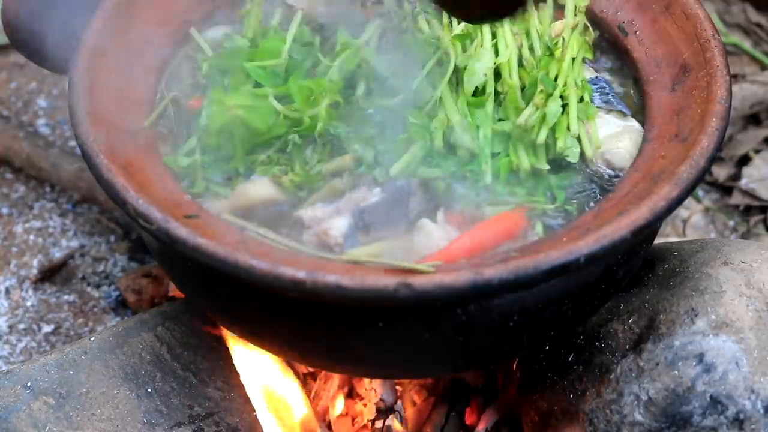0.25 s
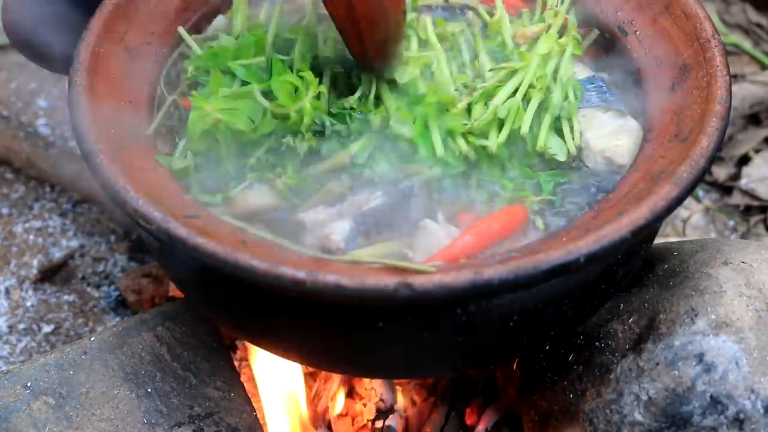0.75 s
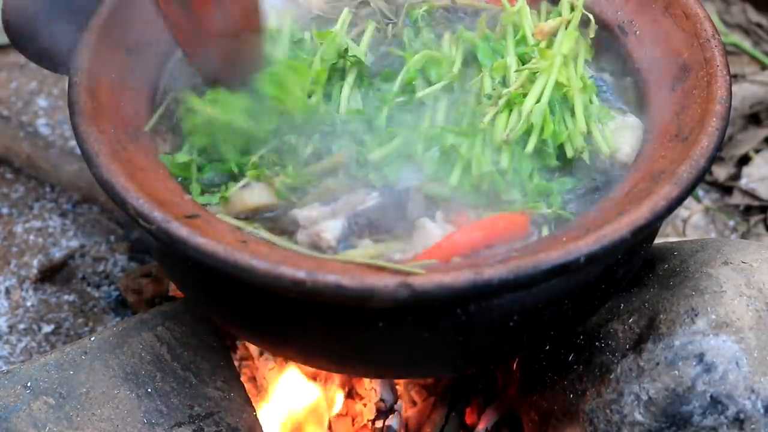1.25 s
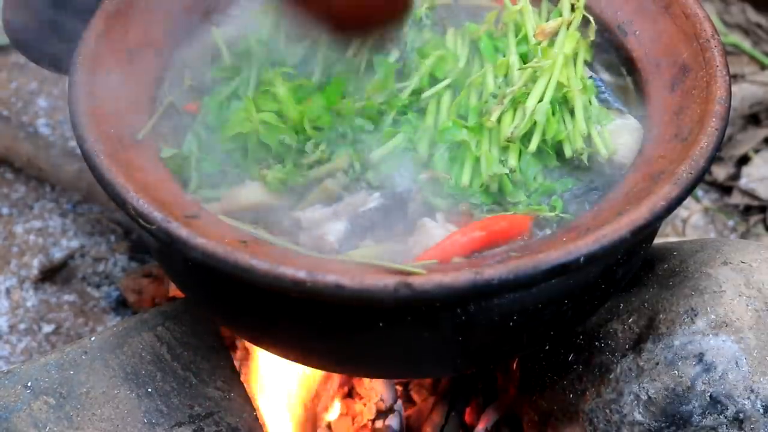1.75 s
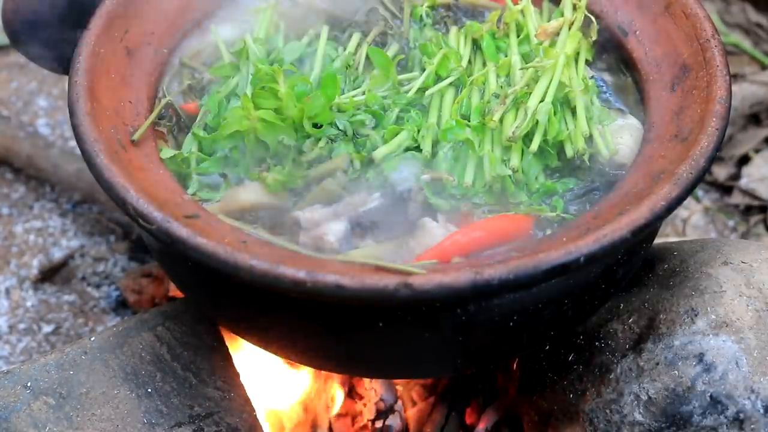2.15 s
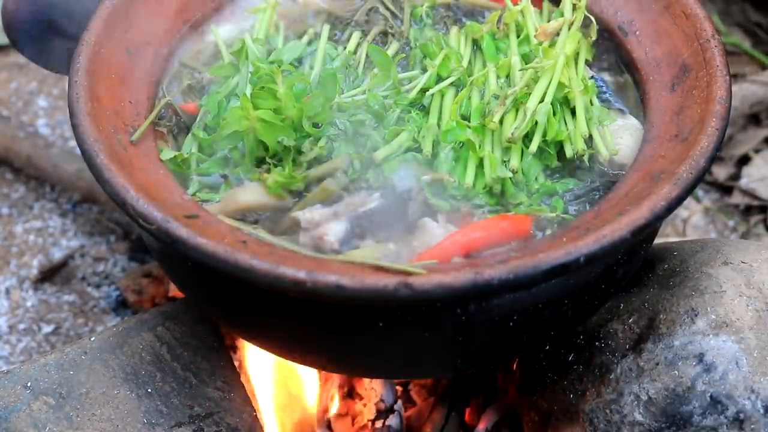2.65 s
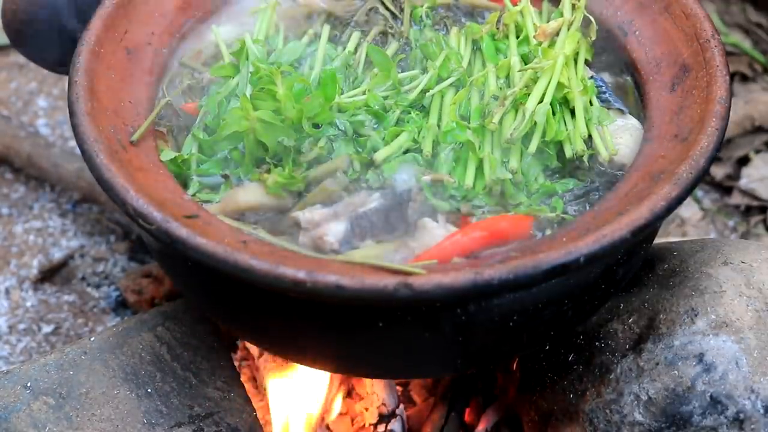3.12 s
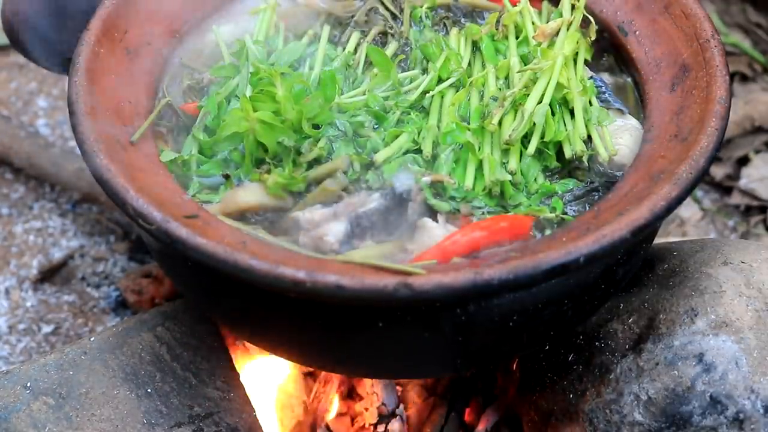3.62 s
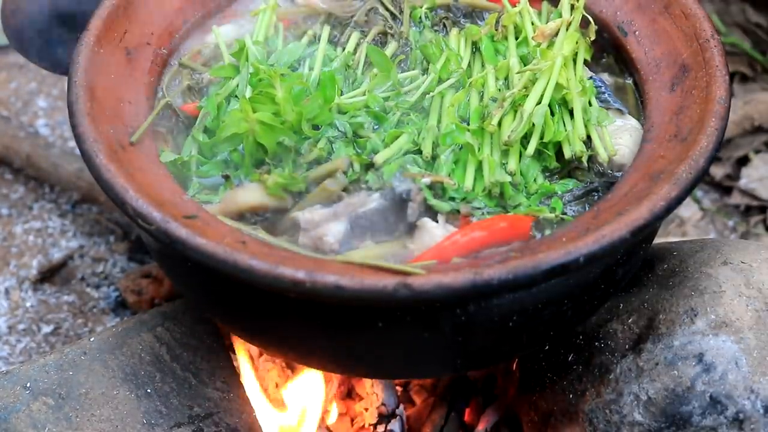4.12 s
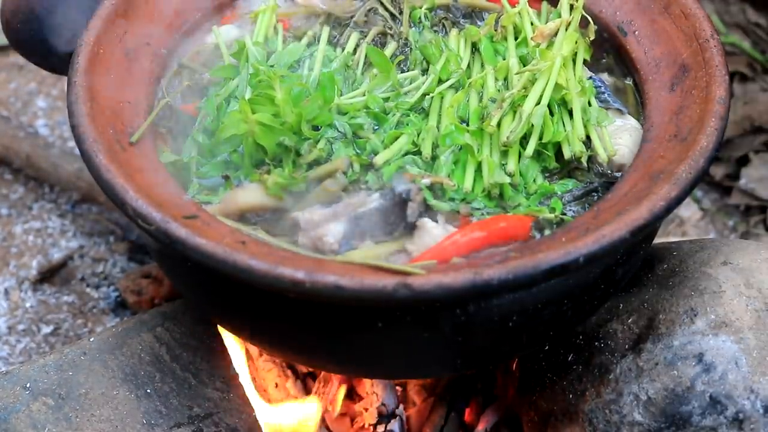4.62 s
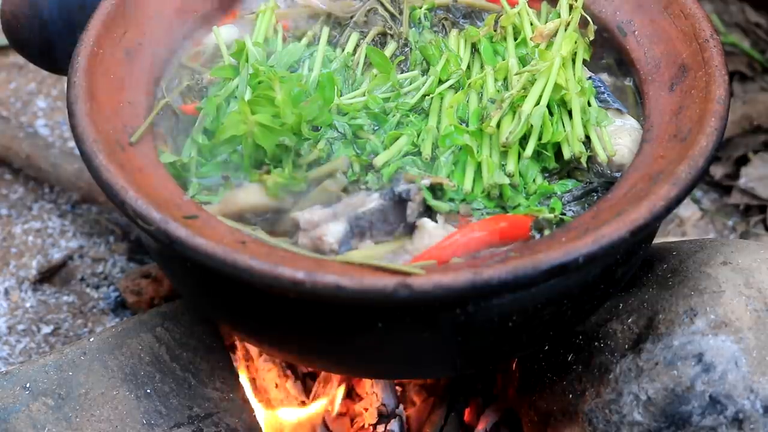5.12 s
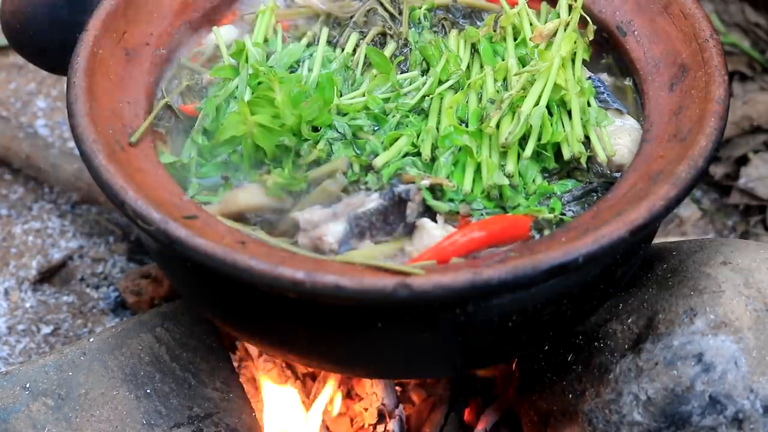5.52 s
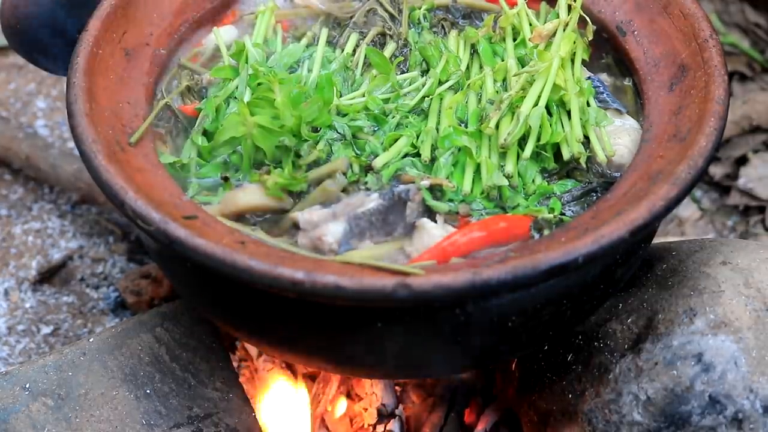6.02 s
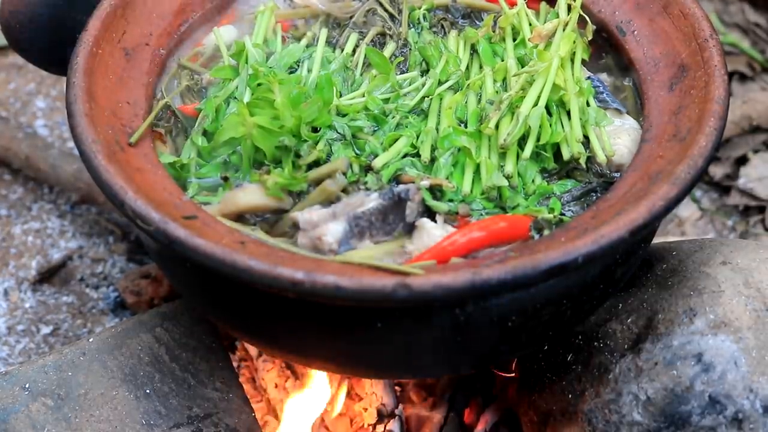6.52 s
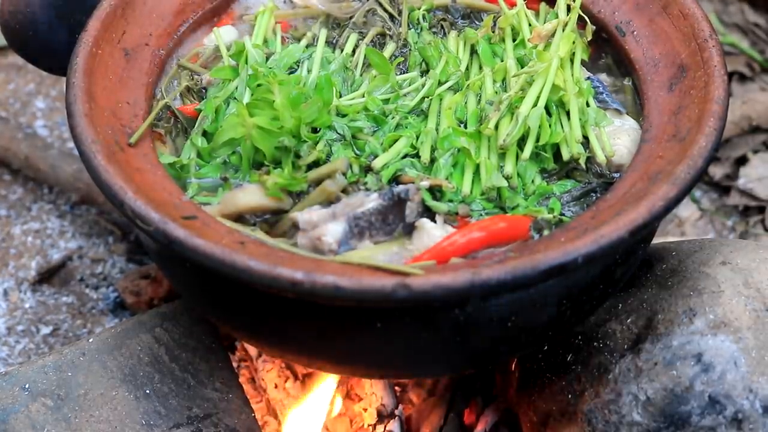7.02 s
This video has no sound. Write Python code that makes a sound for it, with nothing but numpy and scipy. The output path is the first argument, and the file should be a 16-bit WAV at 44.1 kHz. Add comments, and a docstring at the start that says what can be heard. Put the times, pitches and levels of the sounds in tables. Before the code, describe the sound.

A wood fire under a clay pot outdoors, nearly silent at first, then sharp sap pops and dense uneven crackling with one very loud snap.

```python
"""A wood fire burns under a clay pot outdoors: shaped noise makes a soft open-air hiss, and far off an engine drones as
multiples of its turning rate over a rumble. Uneven embers crackle as random narrow-band grains, with a few weak pops;
far birds chirp, and one low soft gurgle sounds, as gliding sines blurred by noise. Just after 2 s bursting sap pops
hard and rings the pot's modes; dense swells of crackle follow from 2.7 s, with more chirps near 4 s. The loudest pop,
a decaying filtered noise burst, comes near 4.4 s and the strongest crackle near 5 s; the fire stays uneven to the end."""
import sys
import numpy as np
from scipy import signal
from scipy.fft import rfft, irfft
from scipy.io import wavfile

SR = 44100
rng = np.random.default_rng(int(sys.argv[2]) if len(sys.argv) > 2 else 0)


def dump(signal):
    """Clip the signal to [-1, 1] and save it as 16-bit WAV at the path in sys.argv[1]."""
    limited = np.clip(np.atleast_2d(signal).T, -1, 1)
    pcm = np.round(limited * 32767).astype(np.int16)
    wavfile.write(sys.argv[1], SR, pcm)


N = 319989


def from_db(db):
    """Level definition: an amplitude ratio is 10 to the power of dB / 20."""
    return 10 ** (np.asarray(db) / 20)


def rms_one(x):
    """Normalization: divides x by its root mean square."""
    return x / np.sqrt(np.mean(x ** 2) + 1e-20)


def in_time(rows):
    """Linear interpolation: the columns of a curve table, one value a sample."""
    s, *columns = np.transpose(rows)
    return [np.interp(np.arange(N) / SR, s, column) for column in columns]


def coloured(x, spectrum):
    """Spectral shaping: weights the Fourier components of x by a (f/Hz, level/dB per Hz) curve; rms 1."""
    hz, level_db = np.transpose(spectrum)
    log_grid = np.log(np.arange(N // 2 + 1) * SR / N + 1)
    gain = from_db(np.interp(log_grid, np.log(hz), level_db))
    return rms_one(irfft(rfft(x) * gain, N))


def drift(rate_hz):
    """Low-passed noise as slow chance: two equal poles at rate_hz, one draw every 20 samples; spread 1."""
    r = np.exp(-2 * np.pi * rate_hz * 20 / SR)
    white = rng.standard_normal(N // 20 + 2002)
    slow = signal.lfilter([1], [1, -2 * r, r * r], white)[2000:]   # past the settling of the filter
    return np.interp(np.arange(N) / 20, np.arange(len(slow)), rms_one(slow))


def resonance(x, hz, width_hz):
    """Damped resonance: a two-pole band-pass with gain 1 on top."""
    r = np.exp(-np.pi * width_hz / SR)
    feedback = [1, -2 * r * np.cos(2 * np.pi * hz / SR), r * r]
    return signal.lfilter([(1 - r * r) / 2, 0, (r * r - 1) / 2], feedback, x)


def narrow(x, hz, width_share):
    """Cascaded resonance: two passes give steep flanks; rms 1."""
    once = resonance(x, hz, width_share * hz)
    return rms_one(resonance(once, hz, width_share * hz))


def ring(clicks, hz, t60):
    """Impulse response of one mode: a unit click sets off a decaying sine of initial height 1."""
    r, w = from_db(-60 / (t60 * SR)), 2 * np.pi * hz / SR
    return signal.lfilter([0, np.sin(w)], [1, -2 * r * np.cos(w), r * r], clicks + 1e-18)


def open_air():
    """Broadband turbulence: white noise shaped into open-air hiss and flame rumble."""
    # relative spectrum of hiss and rumble: f/Hz, level/dB per Hz
    air_spectrum = [(15, -36), (32, 3), (134, 2), (451, -11.5), (677, -5.5), (734, -12), (2410, -15),
                    (3340, -7.5), (4370, -9), (5140, -9), (6210, -10.5), (7710, -5.5), (8590, -16),
                    (14800, -19), (16000, -8.5)]
    level_db = -58.5
    return from_db(level_db) * coloured(rng.standard_normal(N), air_spectrum)


def engine():
    """Harmonic series of a rotating source: its multiples come and go and waver in the air, over a dull rumble."""
    # turning rate and rumble of the far engine: t/s, f/Hz (turns per s), rumble level/dB
    turning = [(0, 43.6, -70), (1.1, 43.6, -101), (1.3, 43.7, -71), (3.1, 43.4, -64.5), (3.35, 36.5, -64),
               (3.9, 36.5, -69), (4.1, 41, -67), (5.05, 42, -68), (5.3, 44, -59.5), (5.9, 46.5, -64.5),
               (7.26, 48, -67)]
    # spells in which one multiple carries: start t/s, length t/s, mid level/dB, multiple of the turning rate
    spells = [(-.3, 1.4, -70, 3), (1.146, 1.1, -66, 2), (1.144, 0.71, -77, 3), (1.19, 1, -68, 4),
              (2.3, 0.57, -68, 2), (3.25, 2.17, -65, 4), (3.9, 1.1, -78.5, 2), (5.15, 1.3, -66.5, 3),
              (5.9, 1.27, -65, 2), (6.7, .9, -71, 4)]
    spell_edge_s = 0.096
    hz, rumble_db = in_time(turning)
    t = np.arange(N) / SR
    phase = 2 * np.pi * np.cumsum(hz * (1 + 0.0052 * drift(3.1))) / SR
    tones = 0
    for s, length, level_db, multiple in spells:
        gate = np.clip(np.minimum(t - s, s + length - t) / spell_edge_s, 0, 1)
        wavering = from_db(level_db + 2.6 * drift(5.3))
        tones = tones + gate * wavering * np.sin(round(multiple) * phase)
    rumble = narrow(rng.standard_normal(N), 106, 1.15)
    return tones + from_db(rumble_db) * rumble


def birds_and_gurgle():
    """Amplitude modulation by noise: gliding sines, birds blurred by distance and leaves, and one low soft gurgle."""
    # far chirps of birds; first row a low, soft gurgle near 1.1 kHz:
    # start t/s, length t/s, first f/Hz, last f/Hz, level/dB before the blur
    glides = [(.65, .12, 1100, 1200, -57), (0.548, 0.15, 5260, 5460, -58), (1.1, 0.14, 4950, 4760, -56),
              (1.441, 0.14, 2900, 3100, -60), (1.606, 0.14, 4950, 5130, -59), (1.755, 0.2, 3390, 3450, -61),
              (3.582, 0.12, 3550, 3440, -52), (3.67, 0.15, 5050, 4600, -50), (4.2, 0.23, 3740, 3600, -52)]
    blur_rate_hz = 280
    out = np.zeros(N)
    blur = drift(blur_rate_hz)
    for s, length, first_hz, last_hz, level_db in glides:
        at, count = round(s * SR), round(length * SR)
        phase = 2 * np.pi * np.cumsum(np.linspace(first_hz, last_hz, count)) / SR
        tone = np.sqrt(np.hanning(count)) * np.sin(phase)
        out[at:at + count] += from_db(level_db) * tone * blur[at:at + count]
    return out


def pot():
    """Modal excitation: a few blows reach the clay and leave its modes ringing."""
    # blows on the pot, to which each mode adds its own level: t/s, level/dB
    pot_blows = [(2.205, -52), (2.314, -52), (2.328, -64), (3.774, -58)]
    # modes of the clay: f/Hz, level/dB against the blow, decay by 60 dB t/s
    pot_modes = [(540, 14.5, 0.081), (1090, 4, 0.34), (1097, 21, 0.046), (1900, 18.5, 0.047)]
    s, blow_db = np.transpose(pot_blows)
    blows = np.zeros(N)
    blows[np.round(s * SR).astype(int)] = from_db(blow_db)
    return sum(from_db(level_db) * ring(blows, hz, t60) for hz, level_db, t60 in pot_modes)


def embers_flares_and_tails():
    """Power addition of incoherent sources: embers, flares and pop tails sum to level, coarse and fine share in dB."""
    # uneven simmer of the embers, rising and sinking under the flares: t/s, level/dB
    ember_curve = [(0, -62.5), (.12, -58.5), (.98, -62.5), (1.9, -59.5), (2.17, -65.5), (2.69, -64.5),
                   (2.73, -48.5), (3.25, -50.5), (3.84, -61.5), (4.3, -53), (4.8, -50), (5.3, -46),
                   (5.77, -61.5), (6.13, -50), (6.5, -53.5), (6.78, -60.5), (7.26, -76)]
    # flares of crackle; the two rows just after 2.2 s are dying tails of hard pops:
    # top reached t/s, held t/s, level/dB, rise and fade t/s over 20 dB (at least 0.005 s),
    # coarse wood level/dB, fine ash level/dB, both against the row's level
    swell_rows = [(.36, .1, -59, 0.11, 1.4, 5.5, 8), (1.42, 0.052, -57, 0.54, 0.18, 0, 13),
                  (2.208, .005, -53, .005, 0.1, -8, 11), (2.335, 0.0045, -48.5, .005, 0.061, -6, -5),
                  (2.711, 0.023, -43, 0.0055, 0.034, -2, 11), (2.776, .06, -45, 0.025, .05, 5, 5.5),
                  (2.862, 0.043, -41.5, 0.053, 0.025, 8, 7.5), (2.935, 0.025, -41, 0.012, 0.036, 3, -2),
                  (2.995, .06, -42.5, .05, 0.042, -12, -1), (3.09, 0.1, -39, 0.2, 0.056, -2.5, -2),
                  (3.265, 0.0081, -40, .05, 0.03, -1.5, -1), (3.385, 0.089, -38.5, 0.068, 0.2, -2.5, -1),
                  (3.62, 0.1, -45.5, 0.044, 0.059, -0.5, 0.5), (3.885, 0.015, -51.5, 0.021, 0.22, 3.5, 4),
                  (4.4, 0.017, -38.5, 0.043, 0.053, -0.5, -2),
                  (4.449, 0.0055, -37, 0.025, 0.075, -5.5, -0.5),
                  (4.65, 0.024, -45.5, 0.24, 0.025, -13, -2), (4.711, 0.11, -41, 0.015, 0.16, -7, -3),
                  (4.872, 0.061, -33, 0.027, 0.017, -7.5, -3), (5.05, 0.016, -37.5, 0.12, 0.075, -0.5, 5),
                  (5.098, 0.01, -32.5, 0.034, 0.15, 2.5, 0.5), (5.22, 0.082, -41, 0.19, 0.022, -1, 3.5),
                  (5.39, 0.051, -44.5, 0.038, 0.079, -2, -0.5), (5.495, 0.042, -40, 0.031, 0.013, -2.5, 4),
                  (5.61, 0.028, -46, .06, 0.062, 2.5, -4), (5.83, 0.0085, -58, 0.036, 0.027, 13, 11),
                  (5.92, 0.11, -49, 0.027, 0.023, 2, -5), (6.3, 0.011, -50, 0.17, 0.3, -19, 9.5),
                  (6.56, 0.02, -43, 0.093, 0.16, -4.5, 5.5), (6.68, 0.0053, -50.5, .03, 0.021, -4, 11),
                  (6.724, 0.0091, -47.5, 0.016, 0.019, -1.5, 5), (6.8, .01, -52, 0.055, 0.3, 3.5, 0),
                  (6.937, 0.035, -41.5, 0.11, 0.089, -9.5, 3.5), (7.04, 0.079, -47, 0.065, 0.053, -5, 7),
                  (7.23, 0.041, -48, .12, .1, -7, 4)]
    ember_coarse_db, ember_fine_db = 2.5, 2.5   # against the ember level
    t = np.arange(0, N, 32) / SR
    level = from_db(np.interp(t, *np.transpose(ember_curve))) ** 2   # powers from here on
    coarse, fine = level * from_db(2 * ember_coarse_db), level * from_db(2 * ember_fine_db)
    for s, held, top_db, rise, fade, coarse_db, fine_db in swell_rows:
        before = np.maximum((s - t) / max(rise, .005), 0)
        after = np.maximum((t - s - held) / max(fade, .005), 0)
        power = from_db(top_db - 20 * (before + after)) ** 2
        level = level + power
        coarse = coarse + power * from_db(2 * coarse_db)
        fine = fine + power * from_db(2 * fine_db)
    curves_db = 10 * np.log10([level, coarse / level, fine / level])
    return in_time(np.transpose([t, *curves_db]))


def crackle():
    """Random impulse process: tiny fibres snap in clumps, each grain strongest in one narrow band for a few cycles."""
    # relative spectrum of the whole crackle: f/Hz, level/dB per Hz
    crackle_spectrum = [(120, -39), (200, -8), (366, -3.5), (424, -5), (968, -1), (1500, -1.5), (2130, 0.5),
                        (2800, -2.5), (3690, 1.5), (4200, -5), (5040, -2.5), (6170, -6.5), (11700, -24),
                        (14600, -19), (16000, -22.5)]
    grains_per_s, grain_spread_db, clump_db = 2000, 4.5, 4
    calm_db, fierce_db, calm_share = -65, -44, 0.62   # quiet embers snap more evenly than fierce flares
    level_db, coarse_db, fine_db = embers_flares_and_tails()
    uneven = np.interp(level_db, [calm_db, fierce_db], [calm_share, 1])
    size_db = uneven * grain_spread_db * np.minimum(rng.exponential(1, N), 3.2)
    sizes = from_db(size_db) * rng.choice([-1, 1], N)
    struck = rng.random(N) < grains_per_s / SR
    grains = sizes * struck * from_db(uneven * clump_db * drift(102))
    pitches, dealt = np.geomspace(220, 15000, 20), rng.integers(0, 20, N)
    out = np.zeros(N)
    for k, hz in enumerate(pitches):
        steam = 0.25 * rng.standard_normal(N)
        own = grains * (dealt == k) + 0.29 * grains + steam   # part of each snap is broad
        coarse_share = np.clip(np.log2(2500 / hz) / 1.7, 0, 1)
        fine_share = np.clip(np.log2(hz / 4000), 0, 1)
        share_db = coarse_db * coarse_share + fine_db * fine_share
        flicker = from_db(share_db + 2.26 * drift(32))
        out += narrow(own, hz, 0.41) * np.sqrt(hz) * (-1) ** k * flicker   # sqrt(hz): even power per Hz
    return from_db(level_db + 0.5) * coloured(out, crackle_spectrum)


def pops():
    """Impulsive gas release: a burst dies through high snap, low wooden body and bright edge; stones scatter a tail."""
    # single pops: t/s, peak level/dB, snap f/Hz, body f/Hz, body level/dB and bright edge level/dB against the snap
    pop_rows = [(0.351, -28.5, 3400, 1300, -11, -9), (0.425, -42, 5140, 740, 10, -16),
                (1.3299, -41.5, 3630, 1040, 7, -12), (1.705, -46, 3000, 800, 10, -15),
                (1.9084, -37, 3280, 1360, 2, -13), (2.2026, -7.5, 5200, 1120, -7, -13),
                (2.3132, -8, 3580, 730, -11, -35), (2.3279, -16.5, 2700, 710, -5, -26),
                (2.3848, -28.5, 3050, 700, -1, -36), (2.464, -37.5, 1820, 680, 0.5, -23),
                (2.7318, -26.5, 1990, 1520, -6, -2), (2.773, -24, 3650, 1140, -1.5, -8),
                (2.7894, -25, 3970, 1290, -3, -17), (2.851, -30.5, 3480, 400, 3, -6),
                (2.8628, -18.5, 5460, 840, -29, -9), (2.8707, -17, 3100, 870, -9, -30),
                (2.8773, -20, 5430, 764, -17, -15), (2.891, -21, 3000, 920, -11, -6),
                (2.8985, -21, 3340, 1090, -2, -14), (2.931, -23, 3540, 1200, -21, -7),
                (2.9447, -27, 2240, 1490, -8, -17), (2.968, -26.5, 5940, 1500, -17, -8),
                (3.052, -23, 3010, 780, -16, -15), (3.0617, -14, 2330, 460, -5, -9.5),
                (3.0785, -24, 2870, 690, -23, -13), (3.177, -31, 4500, 1200, -15, -4),
                (3.2638, -26.5, 3490, 1520, 4, 9), (3.4016, -15.5, 6100, 1250, -34, -28),
                (3.5903, -20, 1960, 744, 10, -30), (3.697, -18, 3300, 1190, 1.5, -10),
                (3.7695, -24.5, 1770, 706, 12, -26), (3.8402, -37, 2440, 1500, -21, -18),
                (3.882, -30, 2200, 1040, 0, -6), (4.0518, -19.5, 3000, 800, -21, -2),
                (4.1543, -35, 3380, 1080, -2, -26), (4.2374, -38, 3440, 650, -9, -30),
                (4.291, -32, 3120, 1500, -25, -17), (4.385, 1, 3460, 1110, -12.5, -22.5),
                (4.6996, -31, 3000, 1450, -20, -27), (4.713, -26, 3360, 1500, -29, -25),
                (4.742, -26, 2100, 1420, -27, -18), (5.0556, -17, 6100, 1160, -20, -9),
                (5.074, -23, 5000, 1320, -23, -15), (5.0931, -3.5, 2260, 920, -8, -16),
                (5.8278, -34.5, 2220, 750, 20, 5), (6.092, -36.5, 1810, 1040, 9, -23),
                (6.174, -31, 3500, 1500, -28, -19), (6.3669, -31.5, 5860, 410, -14, -6),
                (6.3905, -24.5, 3440, 700, -2, -20), (6.4518, -30, 2040, 1010, 21, -19),
                (6.7621, -40, 2030, 1390, -10, -15), (6.796, -40, 4770, 690, -15, -23),
                (6.861, -38, 4700, 1280, -10, -13), (6.9405, -24.5, 3540, 1280, -4, -20),
                (7.19, -31.5, 3130, 1040, -23, -7)]
    snap_width_share, body_width_share, broad_db = 0.4, 0.47, -12.5
    snap_t60_s, body_t60_s = .013, 0.034   # the wooden body outlasts the snap
    tail_db, tail_t60_s, attack_s = -20, 0.044, 0.00031
    burst_db, crack_at = 13, 10   # first crack over the splintering; samples after the first splinter
    size = SR // 8
    t = np.arange(size) / SR
    bursts, tails = rng.standard_normal((2, len(pop_rows), size))
    middle = signal.butter(3, [300, 6100], "band", fs=SR, output="sos")
    upper = signal.butter(2, [800, 6100], "band", fs=SR, output="sos")
    dull = signal.butter(2, 2800, fs=SR, output="sos")
    top = signal.butter(2, [5800, 10000], "band", fs=SR, output="sos")
    out = np.zeros(N + size)
    for (s, peak_db, snap_hz, body_hz, body_db, edge_db), burst, tail in zip(pop_rows, bursts, tails):
        puff = burst * from_db(-60 * t / snap_t60_s) + tail * from_db(tail_db - 60 * t / tail_t60_s)
        puff *= 1 - np.exp(-t / attack_s)
        puff[crack_at] = from_db(burst_db)
        broad = rms_one(signal.sosfilt(upper, puff))
        snap = rms_one(resonance(broad, snap_hz, snap_width_share * snap_hz)) + from_db(broad_db) * broad
        knock = burst * from_db(-60 * t / body_t60_s)
        knock[0] = from_db(burst_db)
        wood = resonance(signal.sosfilt(middle, knock), body_hz, body_width_share * body_hz)
        body = signal.sosfilt(dull, wood)
        edge = signal.sosfilt(top, puff)
        pop = rms_one(snap) + from_db(body_db) * rms_one(body) + from_db(edge_db) * rms_one(edge)
        at = round(s * SR)
        out[at:at + size] += from_db(peak_db) * pop / np.max(np.abs(pop))
    return out[:N]


def scene():
    """Superposition: all sources add and reach two closely spaced microphones alike."""
    total = open_air() + engine() + birds_and_gurgle() + pot() + crackle() + pops()
    return np.tile(total, (2, 1))


def record(dry):
    """Independent self-noise and limiting: each microphone hisses, the loudest pop clips, the top is cut."""
    # relative spectrum of each microphone's own noise: f/Hz, level/dB per Hz
    noise_spectrum = [(15, -41), (25, 9.5), (212, 0), (439, -0.5), (1020, -8.5), (5000, -20), (10100, -7.5),
                      (16000, -6)]
    noise_db, cutoff_hz = -64.5, 16700   # from the cutoff up, 85 dB down
    hiss = [coloured(white, noise_spectrum) for white in rng.standard_normal((2, N))]
    wet = np.clip(dry + from_db(noise_db) * np.array(hiss), -1, 1)
    return signal.sosfilt(signal.cheby2(14, 85, cutoff_hz, fs=SR, output="sos"), wet)


dry = scene()
out = record(dry)
dump(out)
```